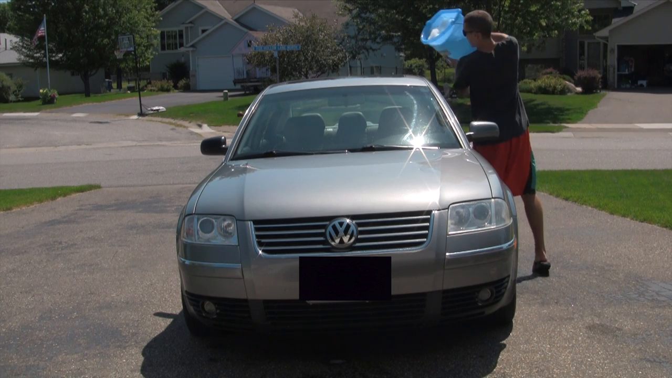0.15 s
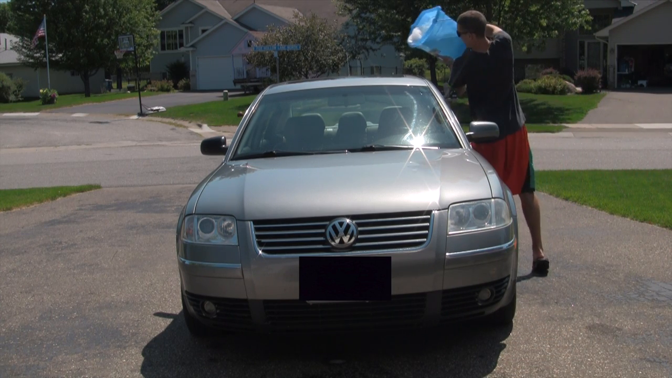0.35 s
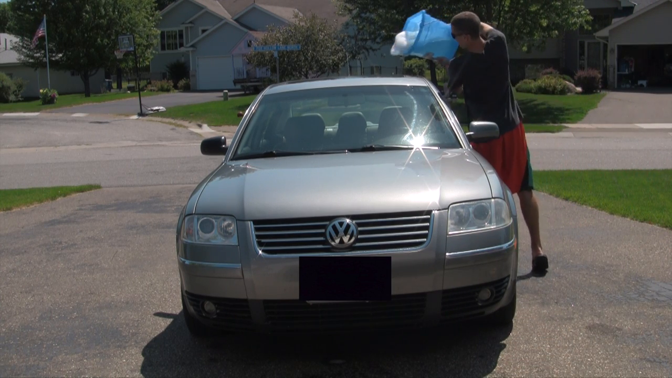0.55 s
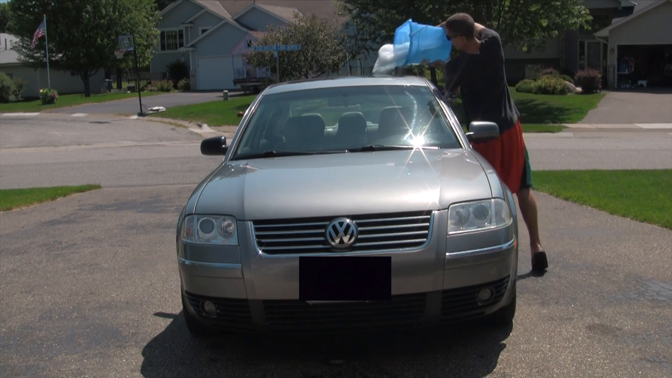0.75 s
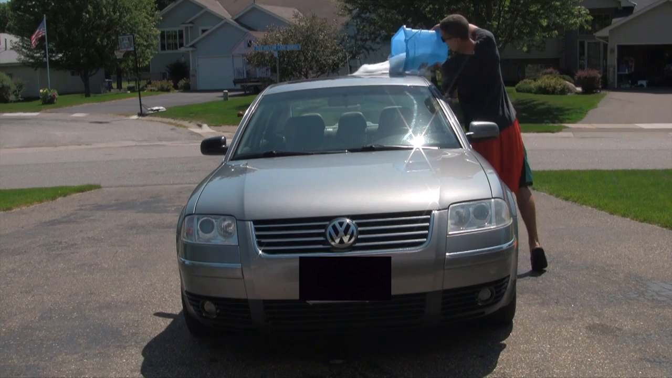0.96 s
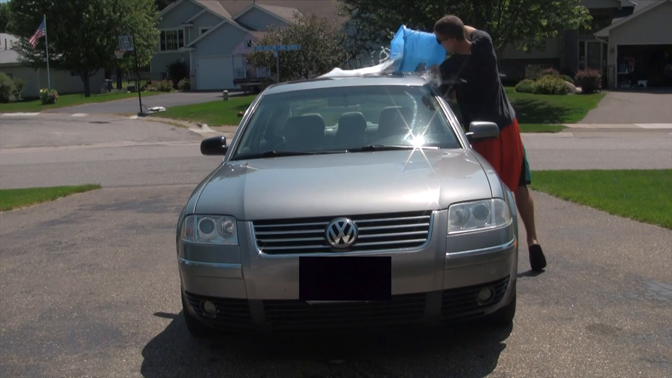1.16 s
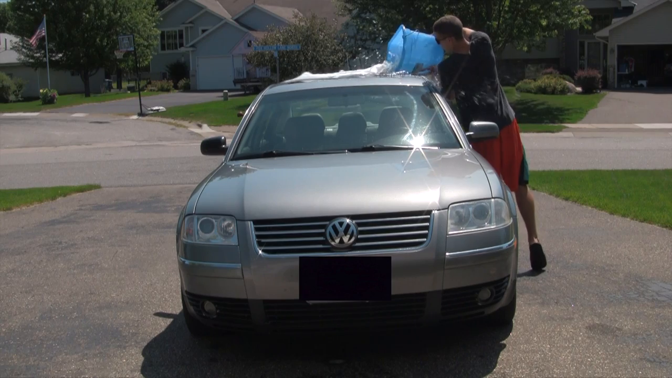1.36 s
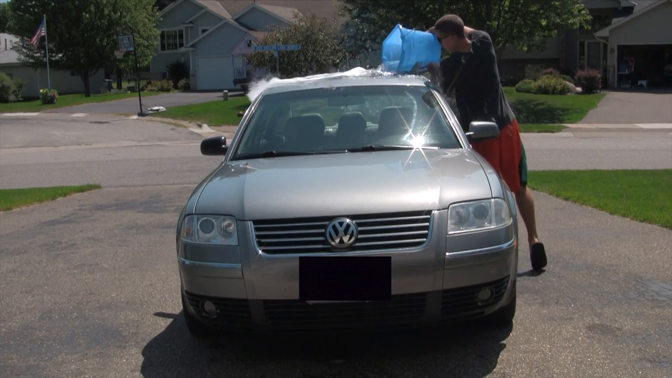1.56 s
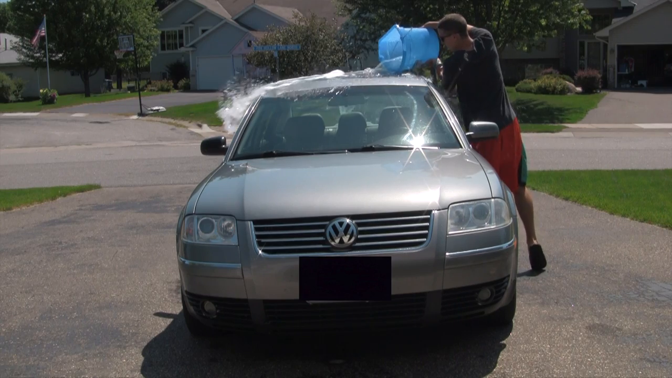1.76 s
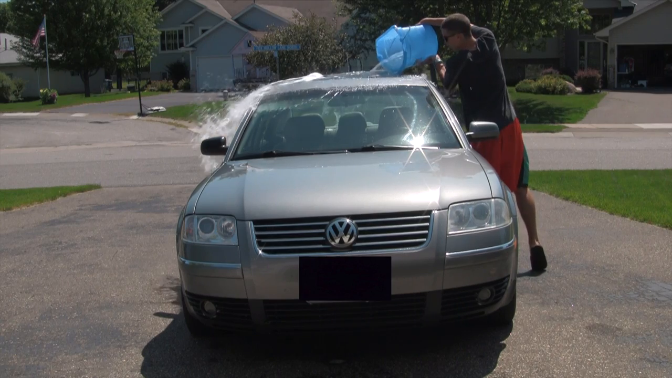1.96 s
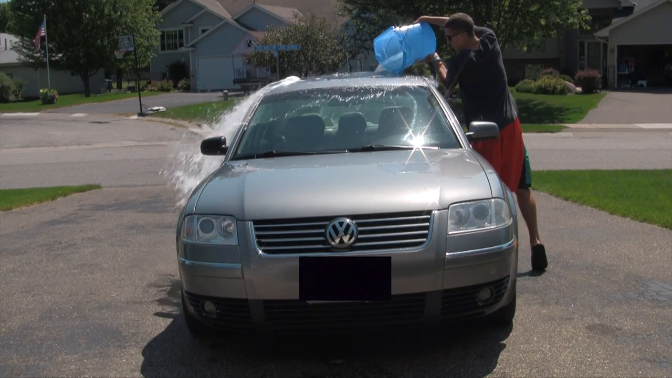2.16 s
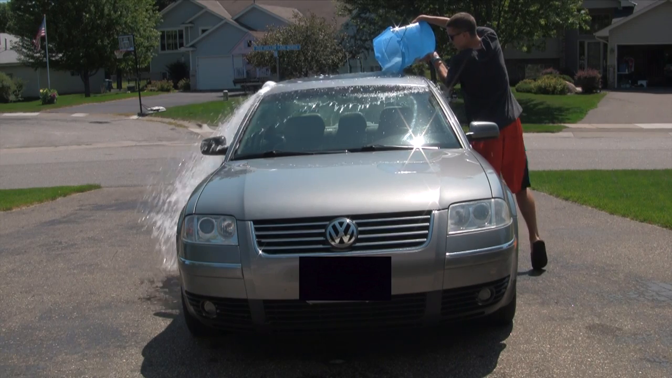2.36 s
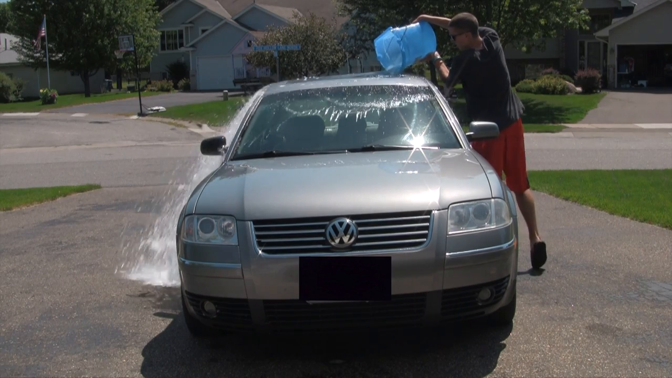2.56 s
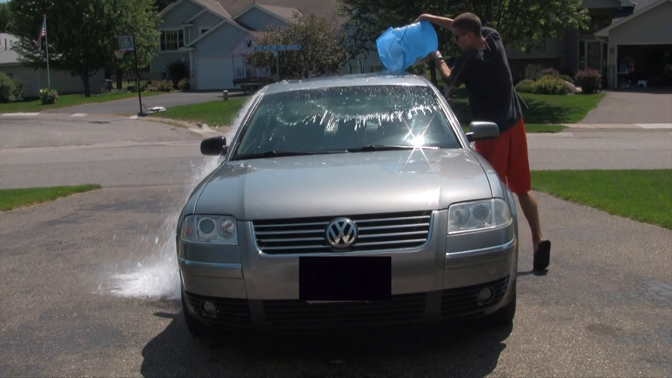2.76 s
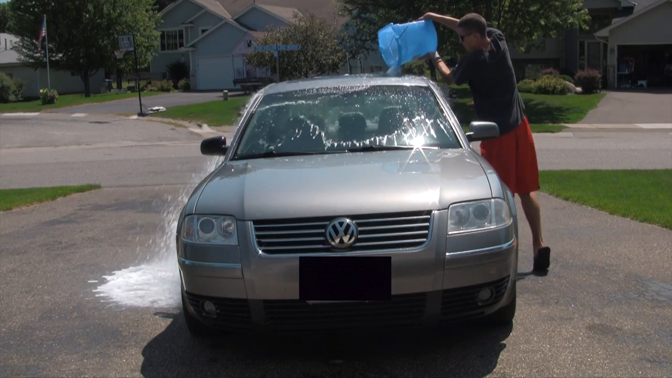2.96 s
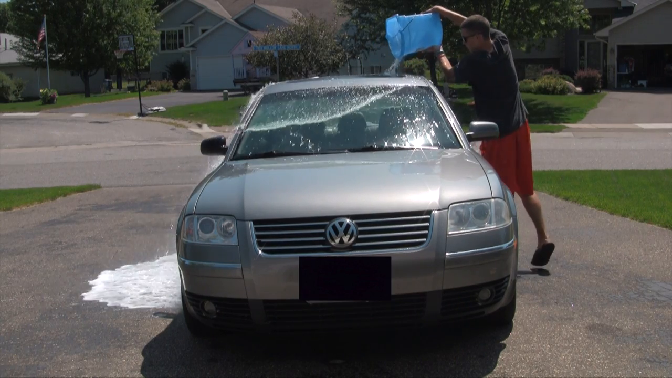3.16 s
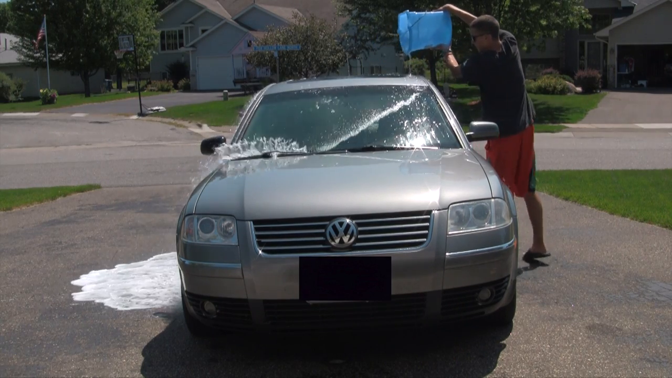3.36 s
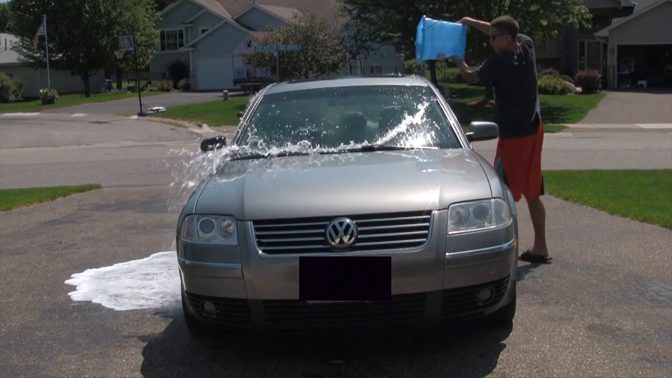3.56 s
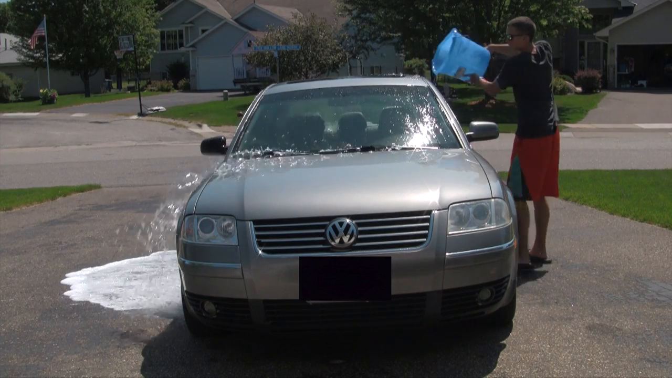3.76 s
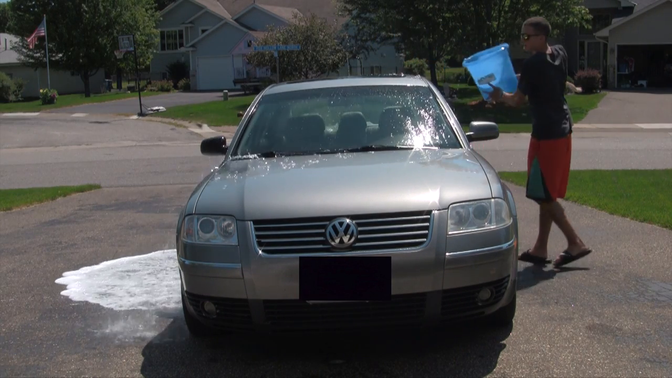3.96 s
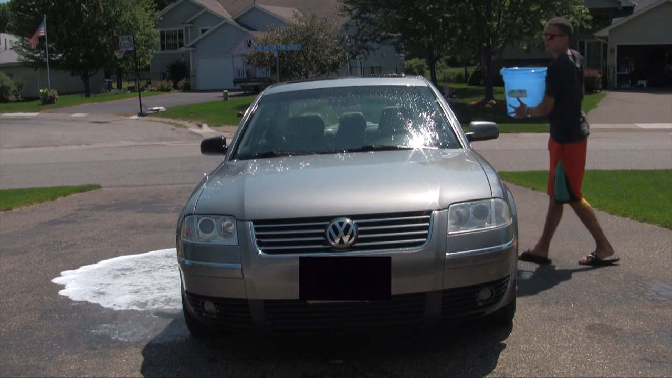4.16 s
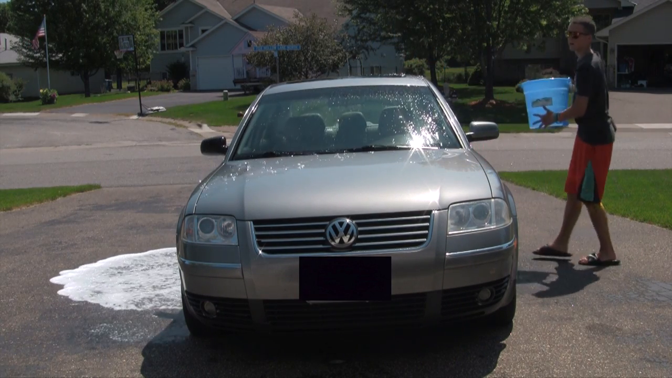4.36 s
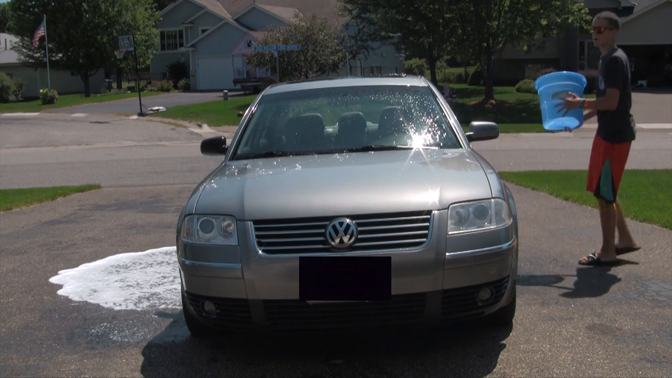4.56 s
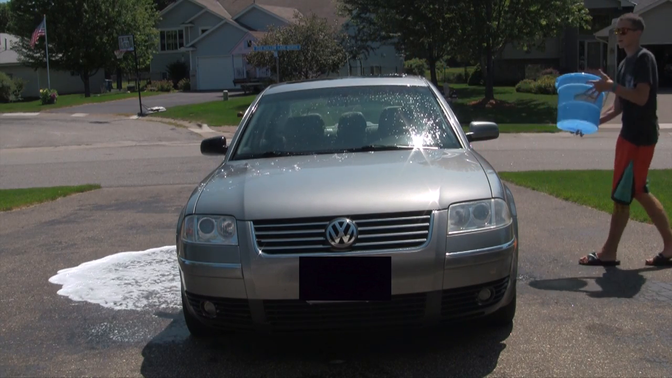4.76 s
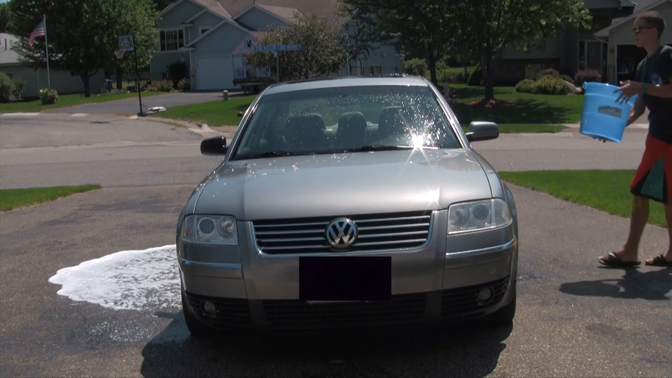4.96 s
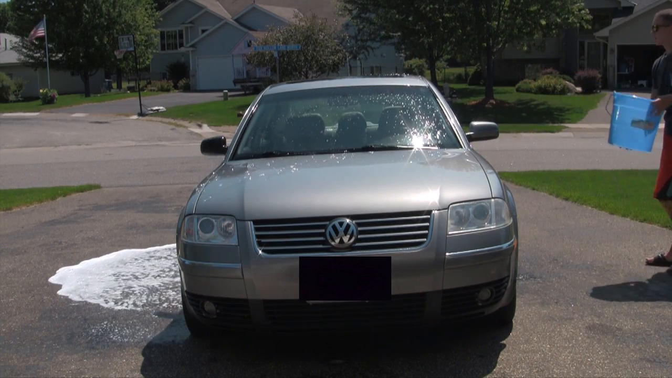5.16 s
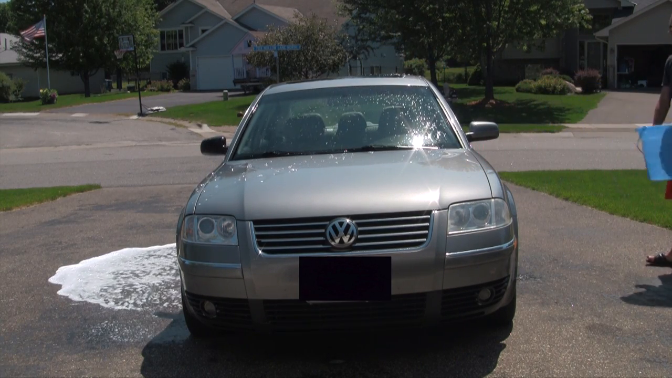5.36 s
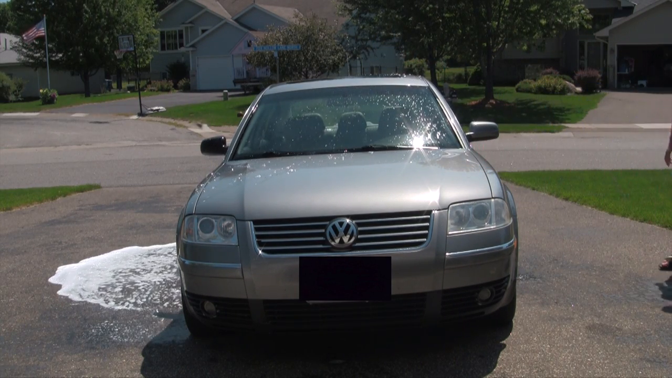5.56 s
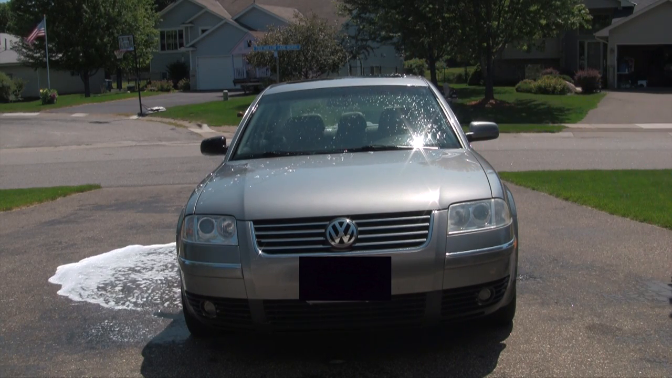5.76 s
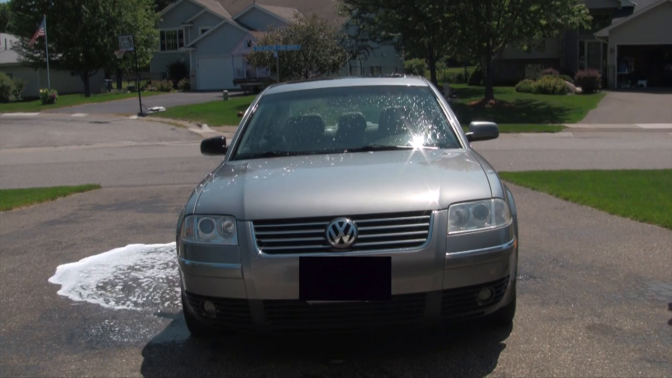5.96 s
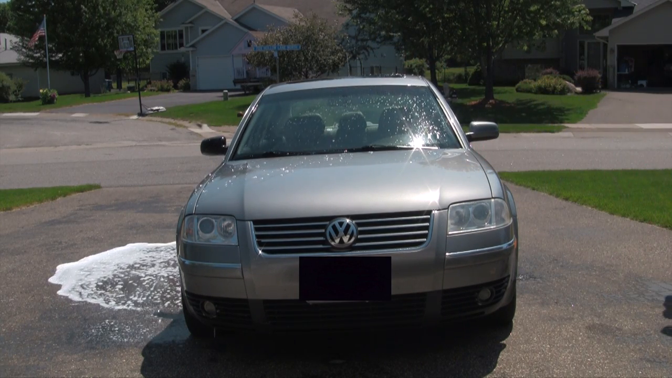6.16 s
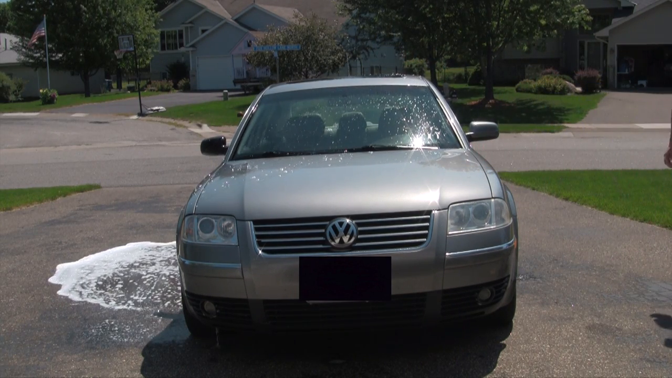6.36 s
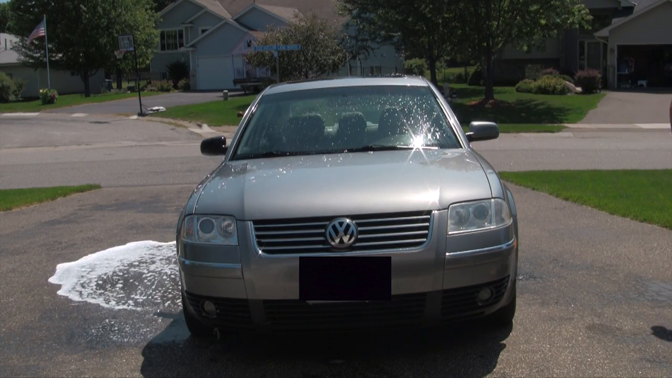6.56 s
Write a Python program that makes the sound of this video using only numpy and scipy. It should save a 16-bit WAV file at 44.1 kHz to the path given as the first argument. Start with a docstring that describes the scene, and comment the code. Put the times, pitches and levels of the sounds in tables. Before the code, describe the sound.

Quiet suburban driveway, stereo microphone a few metres away. In slow motion, dark and without treble, a faint bird whistles, then water booms on a hollow car roof. It gurgles and drips, then pours onto asphalt. A sudden switch to normal speed brings bright splatter and fizzing foam, a second finer splash, scattered ticks, faint sandal scuffs and distant traffic.

```python
"""A driveway in a quiet suburb, where a bucket of water is tipped over a car. Drips are damped sines; slaps
are bursts of force that drum on the resonant steel roof; two sheets of water spatter on the asphalt and leave
fizzing foam, as hiss with patters of drops. Far traffic drones in filtered noise, a bird whistles in gliding
sines and sandals scuff away in gritty bands. Up to the switch all is in slow motion: lower and without treble."""
import sys
import numpy as np
from scipy import signal
from scipy.fft import rfft, irfft, next_fast_len
from scipy.io import wavfile
from scipy.ndimage import uniform_filter1d, map_coordinates

SR = 44100
rng = np.random.default_rng(int(sys.argv[2]) if len(sys.argv) > 2 else 0)


def log_audio(samples):
    """Write samples as a 16-bit WAV file to the path given in sys.argv[1]."""
    # one column per channel
    frames = np.atleast_2d(samples).T
    # limit to full scale, then quantise
    limited = np.clip(frames, -1, 1)
    pcm = np.round(limited * 32767).astype(np.int16)
    wavfile.write(sys.argv[1], SR, pcm)


N = 290971

SWITCH = 2.838  # s, normal speed starts here
DROP_LEFT_DB = 3  # single drops and bubbles: left over right


def amp(db):
    """Decibels to a linear factor."""
    return 10 ** (np.asarray(db) / 20)


def unit(x):
    """x scaled to an rms of 1."""
    return x / np.sqrt(np.mean(x ** 2) + 1e-20)


def along(points, hz):
    """Values at hz, read between (frequency [Hz], value) points on a log axis."""
    f, value = np.transpose(points)
    return np.interp(np.log(hz + 1), np.log(f + 1), value)


def curves(rows):
    """One value per sample for each column after the time."""
    s, *columns = np.transpose(rows)
    t = np.arange(N) / SR
    return [np.interp(t, s, column) for column in columns]


def wobble(rate):
    """A smooth random curve with rate knots a second."""
    knots = rng.standard_normal(int(N * rate / SR) + 4)
    return map_coordinates(knots, [np.arange(N) * rate / SR])


def filtered(x, response):
    """x shaped by a complex response of frequency."""
    m = next_fast_len(N + SR // 2)
    hz = np.fft.rfftfreq(m, 1 / SR)
    return irfft(rfft(x, m) * response(hz), m)[..., :N]


def modes(table):
    """The causal response of a set of resonances, with alternating signs."""
    def response(f):
        total = 0
        for k, (center, width, db) in enumerate(table):
            resonance = 1j * f * width / (center * center - f * f + 1j * f * width)
            total = total + (-1) ** k * amp(db) * resonance
        return total
    return response


def rush(gain, alike, patchy_db):
    """Stereo noise of rms 1: random patches in time and frequency, mid and side set by left-right likeness."""
    z = signal.stft(rng.standard_normal((2, N)), nperseg=256)[2]
    field = uniform_filter1d(rng.standard_normal(z.shape[1:]), 5, 0)
    field = uniform_filter1d(field, 6, 1)
    pair = signal.istft(z * amp(patchy_db * unit(field)), nperseg=256)[1][:, :N]

    def mid_side_gain(hz):
        angle = np.arccos(np.clip(along(alike, hz), -1, 1)) / 2
        return gain(hz) * np.array([np.cos(angle), np.sin(angle)])

    mid, side = filtered(pair, mid_side_gain)
    return unit(np.array([mid + side, mid - side]))


def pings(s, db, hz, pan_db, cycles, size=200):
    """Damped sines with a soft start, one per drop; the trapped bubble rises a little in pitch."""
    n = np.arange(size)
    u = n / SR * hz[:, None]  # cycles since the start
    decay = np.exp(-u / np.reshape(cycles, (-1, 1)))
    shape = (1 - np.exp(-u / 0.28)) * decay * (1 - n / size)
    wave = amp(db)[:, None] * np.sin(2 * np.pi * u * (1 + 0.0071 * u)) * shape
    at = (np.round(s * SR).astype(int)[:, None] + n).ravel()
    channels = []
    for side in (1, -1):
        panned = wave * amp(side * pan_db / 2)[:, None]
        channels.append(np.bincount(at, panned.ravel(), N + size)[:N])
    return np.array(channels)


def air(spectrum, db):
    """The quiet suburb: far traffic and leaves blend into a wide, slowly wavering noise."""
    # left-right likeness of the air: (frequency [Hz], likeness [-1 to 1])
    air_alike = [(60, 0.94), (290, 0.42), (640, 0.31), (3000, 0.02)]
    noise = rush(lambda f: amp(along(spectrum, f)), air_alike, patchy_db=0.8)
    return amp(db + 0.28 * wobble(2.6)) * noise * amp([[.9], [-.9]])


def bird():
    """A far bird: thin whistles whose pitch glides in a straight line under a half-sine swell."""
    # whistles: (time [s], length [s], start pitch [Hz], end pitch [Hz], level [dB])
    chirps = [(0, 0.024, 1810, 1830, -60), (.612, 0.048, 1840, 1850, -63),
              (0.687, 0.052, 1880, 1830, -57.5)]
    out = np.zeros(N)
    for s, length, from_hz, to_hz, db in chirps:
        u = np.arange(round(length * SR)) / (length * SR)
        phase = 2 * np.pi * np.cumsum(from_hz + (to_hz - from_hz) * u) / SR
        out[round(s * SR):][:len(u)] += amp(db) * np.sin(np.pi * u) * np.sin(phase)
    return out


def drops():
    """The largest single drops: a short damped ring under a brighter snap of contact."""
    # single drops: (time [s], level [dB], ring pitch [Hz])
    single_drops = [(0.5487, -36, 2450), (.691, -46, 2270), (.7003, -42, 3050), (0.7396, -39, 1670),
                    (.7446, -41, 2090), (0.772, -28.5, 2380), (0.8035, -38.5, 1950), (.8304, -39, 2110),
                    (.9473, -46, 2520), (.9856, -39, 3020), (1.0137, -34, 1860), (1.054, -8, 1450),
                    (1.2148, -39, 1890), (1.238, -35, 1780), (1.2636, -24, 2600), (1.2865, -33, 3200),
                    (1.336, -38, 1900), (1.3747, -35, 2440), (1.3778, -33, 2000), (1.4276, -29.5, 2700),
                    (1.459, -28, 2400), (1.463, -30, 2100), (1.4844, -33, 2330), (1.5364, -38, 2230),
                    (1.56, -27, 1850), (1.564, -29, 2900), (1.5742, -23, 3300), (1.5894, -21.5, 3660),
                    (1.5965, -30, 3000), (1.7116, -28, 890), (1.941, -28, 1540), (1.833, -28, 3800),
                    (1.848, -28, 3800), (2.186, -28.5, 3600), (2.3604, -26, 1590), (2.4192, -19, 2890),
                    (2.446, -23.5, 2520), (2.555, -25.5, 1520), (2.594, -14.5, 3100), (2.6001, -15.5, 2880),
                    (2.637, -18.5, 3110), (2.6531, -13.5, 1650), (2.6598, -17, 2370), (2.674, -10, 1710),
                    (2.6777, -17, 2880), (2.69, -13, 2840), (2.718, -14, 1450), (2.747, -15, 1700),
                    (2.7564, -20, 2240), (2.7794, -14, 2360), (2.7826, -10, 2580), (2.8094, -15, 3030),
                    (2.8276, -20, 2610), (2.913, -15, 4400), (2.9184, -7.5, 5300), (2.9962, -11.5, 5250),
                    (3.004, -12.5, 5310), (3.0331, -16.5, 5220), (3.0615, -17.5, 6430), (3.2535, -11, 6640),
                    (3.787, -17, 3630), (3.814, -22, 2700), (3.84, -17, 3160), (3.8616, -8, 5370),
                    (3.8706, -16, 5510), (3.8822, -14, 3420), (3.8928, -10, 7660), (3.944, -18, 5650),
                    (3.9693, -13.5, 6540), (3.9904, -13, 6500), (4.0281, -19, 6120), (4.032, -13, 6500),
                    (4.0486, -13, 6600), (4.064, -16.5, 6500), (4.0706, -11.5, 8000), (4.085, -14.5, 3970),
                    (4.09, -15.5, 4400), (4.0954, -17, 6080), (4.1297, -11.5, 9200), (4.169, -19.5, 3780),
                    (4.1865, -20, 6550), (4.196, -21, 5000), (4.203, -21, 6840), (4.212, -23.5, 7100),
                    (4.223, -23, 7760), (4.2335, -22, 8120), (4.261, -24.5, 2780), (4.274, -24, 7500),
                    (4.3048, -17.5, 7600), (4.4748, -26.5, 7500), (4.571, -23.5, 7860), (5.2112, -35, 4910),
                    (5.306, -31, 6530), (5.3754, -30, 6960), (5.569, -35, 4300), (5.775, -28, 7800),
                    (5.813, -34, 4730), (6.241, -41, 3800)]
    ring_cycles, snap_cycles = 1.42, 1  # cycles to fall to 1/e
    snap_db, snap_over = -4.5, 1.6  # snap against the ring: level, pitch ratio
    s, db, hz = np.transpose(single_drops)
    pan_db = np.full(len(s), DROP_LEFT_DB)
    ring = pings(s, db, hz, pan_db, ring_cycles, size=400)
    snap_hz = np.minimum(hz * snap_over, SR / 3)
    snap = pings(s, db + snap_db, snap_hz, pan_db, snap_cycles, size=100)
    return ring + snap


def scuffs():
    """Rubs, squeaks and sloshes: friction as short gritty bands of noise under a soft hump."""
    # rubs: (time [s], level [dB], center [Hz], length [s], half width of the band [Hz])
    rubs = [(0.76, -63.5, 2400, 0.073, 600), (2.56, -45.5, 5620, 0.32, 905), (2.654, -35, 3140, 0.2, 300),
            (3.062, -44, 1220, 0.22, 350), (4.8, -46.5, 6000, 0.064, 5970), (4.935, -51, 900, 0.08, 900),
            (5.412, -55.5, 2400, 0.044, 350), (6.065, -54.5, 2420, 0.033, 120),
            (6.081, -45, 2570, 0.05, 454), (6.203, -63, 6980, 0.035, 4000), (6.45, -55.5, 3660, 0.042, 450)]
    grit_db = 3.5  # depth of the grain
    out, t = 0, np.arange(N) / SR
    for s, db, hz, length, width_hz in rubs:
        u = np.clip((t - s) / length, 0, 50)
        hump = (3 * u * np.exp(1 - 3 * u)) ** 2  # crests a third of the way in
        noise = rng.standard_normal(N)
        band = unit(filtered(noise, lambda f: 1 / (1 + ((f - hz) / width_hz) ** 2)))
        grit = unit(band * amp(grit_db * wobble(500)))
        out = out + amp(db) * hump * grit
    return out * amp([[-.6], [.6]])


def roof():
    """Pouring water shakes the roof panel and the cabin air; lumps slap the panel, each a short burst of force."""
    # water load on the panel: (time [s], level [dB])
    drum = [(.98, -59), (1.047, -44), (1.06, -26), (1.074, -30.5), (1.08, -26), (1.096, -21), (1.101, -32),
            (1.125, -25), (1.146, -29), (1.151, -27), (1.17, -30.5), (1.2, -30.5), (1.24, -28.5),
            (1.292, -35.5), (1.31, -34), (1.4, -33.5), (1.495, -37), (1.52, -40.5), (1.6, -43.5),
            (1.9, -51.5), (2.62, -49.5), (2.736, -43.5), (2.83, -51.5)]
    # resonances of the steel panel: (frequency [Hz], width [Hz], level [dB])
    panel_modes = [(139, 46, -4.5), (215.8, 13, 0), (267.4, 36, -1.5), (360, 91, -4), (465, 52, -2),
                   (500, 57, -4), (570, 52, -7), (752, 120, -18.5), (948, 48, -17)]
    # resonances of the cabin air: (frequency [Hz], width [Hz], level [dB])
    cabin_modes = [(52.7, 5.3, -3.5), (88, 45, -6), (95.7, 5.9, 4.5)]
    # left-right likeness of the panel: (frequency [Hz], likeness [-1 to 1])
    roof_alike = [(100, .97), (900, .72)]
    # lumps of water: (time [s], strength of the slap [dB])
    slaps = [(1.052, -11.5), (1.06, -3.5), (1.079, -4.5), (1.085, -8), (1.092, -7.5), (1.1487, -3.5),
             (1.159, -6.5), (1.239, -21), (1.309, -17), (1.346, -14), (1.378, -15), (1.49, -26)]
    boom_db = -5  # cabin air against the panel
    slap_force_db = 16.5  # raises a slap to the force that rings the panel
    push_db = 10  # first blow over the force that follows

    panel_db, = curves(drum)
    load = amp(panel_db + 0.43 * wobble(30.25)) * rush(modes(panel_modes), roof_alike, patchy_db=2.0)
    boom = amp(panel_db + boom_db) * rush(modes(cabin_modes), [(70, 1.0)], patchy_db=0.5)
    force, t = np.zeros(N), np.arange(SR // 20) / SR
    for s, db in slaps:
        at = round(s * SR)
        force_db = db + slap_force_db
        burst = amp(force_db - 60 * t / 0.014)  # falls 60 dB in 14 ms
        force[at:][:len(t)] += burst * rng.standard_normal(len(t))
        force[at] += amp(force_db + push_db)
    rung = filtered(force, modes(panel_modes))
    return (load + boom + rung) * amp([[1.7], [-1.7]])


def spatter(sizes, start, end):
    """Each drop size is a hiss of countless far impacts plus a patter of near ones, surging in clumps."""
    # falling and running water: (time [s], level [dB], tilt that lifts fine and lowers coarse drops [dB])
    water = [(.99, -61, -1.5), (1.015, -35.5, -2), (1.045, -39, -1), (1.062, -32, -4.5), (1.12, -39, -4),
             (1.25, -41.5, -5.5), (1.37, -49.5, -9.5), (1.47, -49.5, -4.5), (1.552, -51.5, -2),
             (1.558, -44, -1), (1.64, -43, -1), (1.75, -42, -5.5), (1.82, -44, -4.5), (1.84, -47, -3.5),
             (1.9, -46, -6.5), (1.96, -48, -5), (2.18, -49.5, -8.5), (2.3, -50.5, -4), (2.552, -44, 0.5),
             (2.557, -39, 2.5), (2.62, -37, 5), (2.68, -31.5, 0.5), (2.73, -28.5, 0), (2.78, -32, 2.5),
             (2.83, -32, 1), (2.87, -32, 2.5), (2.915, -31, 4), (3.13, -37, 2), (3.4, -41.5, 3.5),
             (3.62, -44.5, 3), (3.84, -41, 6.5), (3.93, -42.5, 6), (4.02, -41, 9), (4.08, -39.5, 9),
             (4.11, -47.5, 13.5), (4.21, -49, 11.5), (4.27, -47.5, 3.5), (4.6, -61, 8), (5.25, -62, 3),
             (6.6, -61, 4.5)]
    # share of the middle drop size: (time [s], level [dB])
    middle = [(1, -1.5), (1.2, -5), (1.4, -5), (1.56, -3), (1.7, -2.2), (1.84, -3), (2, 5), (2.2, 4.5),
              (2.45, 1.5), (2.57, -3), (2.7, -2), (2.83, 1), (2.95, -1.3), (3.2, -0.5), (3.6, 1.3),
              (3.85, 2.5), (4.05, 1.5), (4.15, 1), (4.3, 1.5), (4.7, 3), (6.6, -3.5)]
    # left-right likeness of the hiss before panning: (frequency [Hz], likeness [-1 to 1])
    water_alike = [(300, 0.59), (1000, 0.76), (2000, 0.55), (6000, 0.56), (12000, 0.36)]
    # coarse, middle and fine drops: left over right [dB]
    left_over_right = (5, 1.5, 4)

    out, clump = 0, wobble(16)  # all sizes share the clumps
    flow_db, finer_db = curves(water)
    middle_db, = curves(middle)
    tilts = (-finer_db, middle_db, finer_db)
    for tilt_db, left_db, size_row in zip(tilts, left_over_right, sizes):
        hz, spread, rate, level_db, patter_db, cycles = size_row
        hiss = rush(lambda f: np.exp(-np.log2((f + 1) / hz) ** 2 / (4 * spread ** 2)),
                    water_alike, patchy_db=2.17)

        normal = rng.standard_normal((6000, 4))  # size, pitch, pan and ring of each drop
        s = start + np.cumsum(rng.exponential(size=6000)) / rate
        normal, s = normal[s < end], s[s < end]
        size_db = 7 * np.clip(normal[:, 0], -3, 1.7)  # random size, the largest capped
        pitch = np.clip(hz * 2 ** (spread * normal[:, 1]), 100, SR / 3)
        pan_db, ring = 3 * normal[:, 2], cycles * 1.6 ** normal[:, 3]
        patter = pings(s, size_db, pitch, pan_db, ring, size=320)
        patter = unit(patter) * np.sqrt((end - start) * SR / N)  # rms 1 within its own span

        surge_db = 0.74 * clump + 0.83 * wobble(25.05)
        level = amp(flow_db + tilt_db + level_db + surge_db)
        out = out + level * (hiss + amp(patter_db) * patter) * amp([[left_db / 2], [-left_db / 2]])
    return out


def splats():
    """A lump of water bursts at once into a broad band of noise that dies quickly."""
    # bursting lumps: (time [s], level at the start [dB], center [Hz])
    lumps = [(1.004, -42, 1860), (1.017, -47, 1850), (1.0523, -25, 2480), (1.06, -28, 3380),
             (1.1608, -36, 2480), (1.241, -40, 2840), (1.285, -45, 1830), (1.0779, -31, 900),
             (1.3098, -38.5, 1100), (1.557, -43.5, 2300), (1.573, -38.5, 1850), (1.596, -37.5, 2800),
             (1.711, -41, 2580), (2.5563, -35.5, 1860), (2.5562, -34, 4200), (2.5929, -28.5, 3200),
             (2.673, -25, 3080), (2.717, -32, 3040), (2.774, -26.5, 1990), (2.837, -29, 6400),
             (2.895, -20.5, 5450), (2.912, -24.5, 5540), (2.998, -27, 7760), (3.699, -30, 3100),
             (3.761, -32.5, 7070), (3.895, -32, 11200), (3.9625, -24.5, 5000), (3.971, -29, 8000),
             (3.9887, -22.5, 9600), (4.049, -21.5, 6660), (4.129, -31, 11100), (5.7734, -48, 7650),
             (6.038, -52, 8300), (6.088, -43, 8500), (6.1924, -44, 7850), (6.2713, -51, 7400),
             (6.35, -41.5, 5000)]
    slow_t60, normal_t60 = 0.041, 0.031  # s, time to fall 60 dB
    out, t = np.zeros((2, N + SR)), np.arange(SR // 8) / SR
    for s, db, hz in lumps:
        noise = rng.standard_normal(len(t)) + 0.15 * rng.standard_normal((2, len(t)))
        edges = [hz / 1.4, min(hz * 1.4, SR / 2.2)]
        band = signal.lfilter(*signal.butter(1, edges, "bandpass", fs=SR), noise)
        t60 = slow_t60 if s < SWITCH else normal_t60
        at = round(s * SR)
        out[:, at:at + len(t)] += amp(db - 60 * t / t60) * unit(band)
    return out[:, :N] * amp([[1.3], [-1.3]])


def bubbles():
    """Air pockets trapped in the running water gurgle, each a sine that rings for several cycles."""
    # trapped air: (time [s], level [dB], pitch [Hz])
    pockets = [(1.312, -34, 1750), (1.333, -33, 1720), (1.644, -42, 566), (1.655, -30, 1880),
               (1.686, -30, 785), (1.697, -32, 1130), (1.7116, -29.5, 765), (1.739, -36, 1100),
               (1.773, -27.5, 623), (1.884, -41, 724), (1.901, -33.5, 1900), (1.939, -33, 790),
               (1.971, -30.5, 1610), (1.995, -35.5, 895), (2.031, -31, 850), (2.07, -39.5, 877),
               (2.083, -35, 2730), (2.11, -34, 855), (2.137, -31, 680), (2.168, -31, 850),
               (2.17, -33.5, 1830), (2.19, -33, 890), (2.568, -23.5, 1440), (2.672, -26, 1740),
               (2.701, -20.5, 2730), (2.728, -23, 530), (2.772, -34.5, 800), (2.824, -30.5, 760),
               (2.861, -28.5, 790), (2.965, -36, 1200), (3.061, -30.5, 1220), (3.151, -22, 1180),
               (3.151, -27.5, 1430), (3.309, -51, 1200), (3.346, -46, 1190)]
    s, db, hz = np.transpose(pockets)
    return pings(s, db, hz, np.full(len(s), DROP_LEFT_DB), cycles=4, size=1200)


def drone():
    """Far vehicles swell and fade: noise through tyre resonances over a lower rumble."""
    # far vehicles: (time [s], drone level [dB], rumble level [dB])
    vehicles = [(2.84, -51, -54.5), (3.3, -52.5, -54.5), (3.75, -49, -55), (4.24, -52, -56.5),
                (4.47, -50.5, -50), (5.21, -52.5, -53), (5.9, -48, -51.5), (6.25, -40.5, -48),
                (6.6, -46.5, -52.5)]
    # resonances of the tyre drone: (frequency [Hz], width [Hz], level [dB])
    tyre_modes = [(208, 35, 0.4), (288, 61, -1.5), (346, 39.6, 3), (422, 87, -3.5), (501, 100, -7)]
    # resonances of the rumble: (frequency [Hz], width [Hz], level [dB])
    rumble_modes = [(57, 31, -6.5), (120.4, 10.7, -0.5)]
    drone_db, rumble_db = curves(vehicles)
    hum = rush(modes(tyre_modes), [(100, 0.88), (500, 0.94)], patchy_db=0.1)
    hum = amp(drone_db + 0.2 * wobble(9.8)) * hum
    rumble = amp(rumble_db) * rush(modes(rumble_modes), [(80, 0.95)], patchy_db=2.0)
    return (hum + rumble) * amp([[1.2], [-1.2]])


def scene():
    """The slowed part, then the part at normal speed, with the single water sounds and scuffs across both."""
    # air spectra in slow motion and at normal speed: (frequency [Hz], relative level per Hz [dB])
    slow_spectrum = [(15, -23), (25, -2.5), (82, -5), (113, -5), (150, -2), (208, -12), (1650, -33.5),
                     (1890, -35.5), (2680, -33.5), (3230, -37), (6500, -27), (8450, -35), (14300, -120)]
    normal_spectrum = [(88, -16.5), (150, -4.5), (335, -13), (684, -13), (889, -13.5), (1790, -22),
                       (2700, -29.5), (3900, -26.5), (8000, -25.5), (15000, -28.5)]
    # coarse, middle and fine drops, in slow motion and at normal speed: (pitch [Hz], spread [octaves],
    # drops [per s], level [dB], patter against hiss [dB], ring [cycles to fall to 1/e])
    slow_sizes = [(783, 0.65, 250, -4, -6, 3.2), (1946, 0.45, 460, -1.5, -3, 2.2),
                  (3700, 0.37, 1100, -5.5, -2, 1.3)]
    normal_sizes = [(1280, 0.67, 470, -3, -13.5, 2.9), (3475, 0.57, 900, 0, -7, 1.5),
                    (7840, 0.43, 1500, -2.5, -5.5, 1.2)]
    slow = air(slow_spectrum, db=-49) + roof() + spatter(slow_sizes, 0, SWITCH) + bird()
    normal = air(normal_spectrum, db=-51) + drone() + spatter(normal_sizes, SWITCH, N / SR)
    background = np.where(np.arange(N) < SWITCH * SR, slow, normal)
    return background + splats() + drops() + bubbles() + scuffs()


def record(dry):
    """The microphone's phase and tone; slow motion halves the band and a 2 ms gap marks the switch."""
    # phase between the microphone ports: (frequency [Hz], lead of the left [radians])
    port_phase = [(8000, 0.094), (12000, -0.97), (15300, -.8)]
    # tone in slow motion and at normal speed: (frequency [Hz], gain [dB])
    slow_mic = [(20, -1.5), (2600, -1.3), (3300, 1), (4200, -0.9), (6000, -6.5), (6500, -10), (6900, -16.5),
                (7200, -28.5)]
    normal_mic = [(20, -4), (60, -0.5), (6300, 0.88), (7600, 2), (9000, -1), (12000, -3.5), (14000, -5),
                  (15700, -21)]
    slow_top_hz, top_hz = 7250, 15760  # no sound is kept above these
    t = np.arange(N) / SR
    dry = filtered(dry, lambda f: np.exp(np.outer([.5j, -.5j], along(port_phase, f))))
    slow = filtered(dry, lambda f: amp(along(slow_mic, f)) * (f < slow_top_hz))
    normal = filtered(dry, lambda f: amp(along(normal_mic, f)))
    fade_out = np.clip((SWITCH - .002 - t) / .001, 0, 1)  # 1 ms fade into the gap
    joined = slow * fade_out + normal * (t >= SWITCH)
    return filtered(joined, lambda f: f < top_hz)


dry = scene()
out = record(dry)
log_audio(out)
```